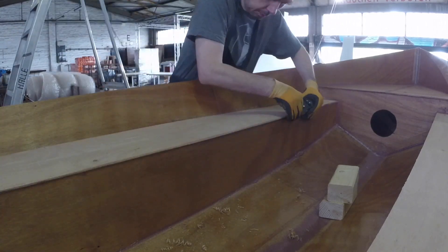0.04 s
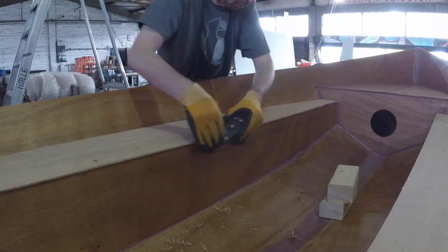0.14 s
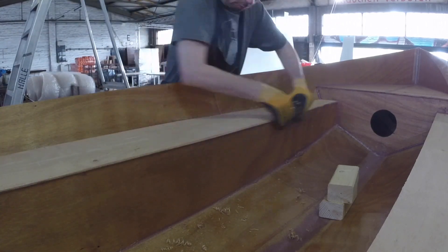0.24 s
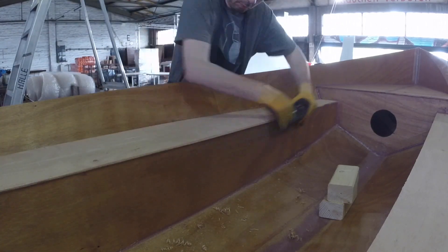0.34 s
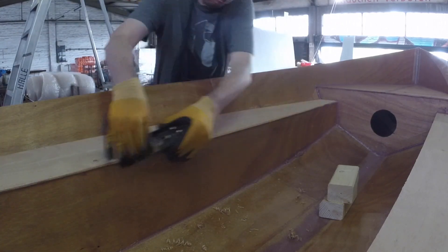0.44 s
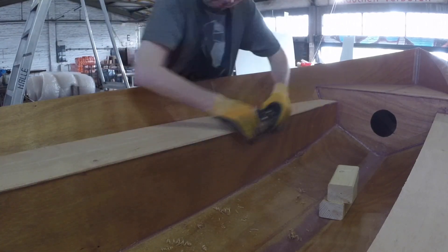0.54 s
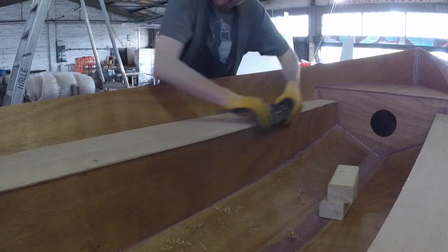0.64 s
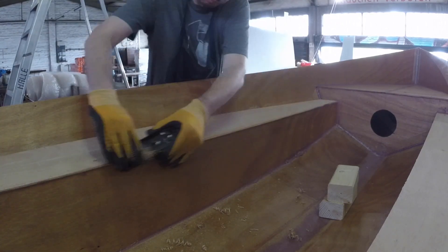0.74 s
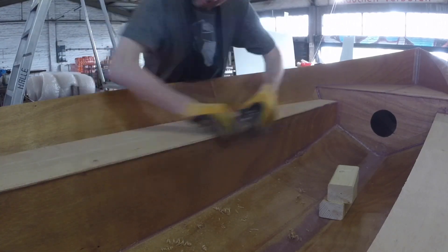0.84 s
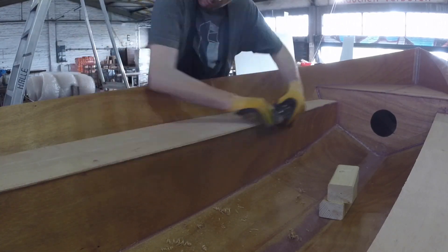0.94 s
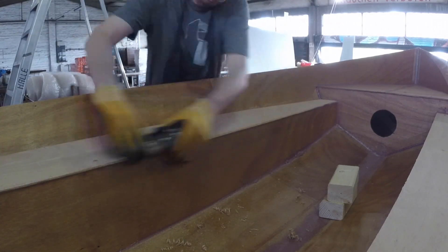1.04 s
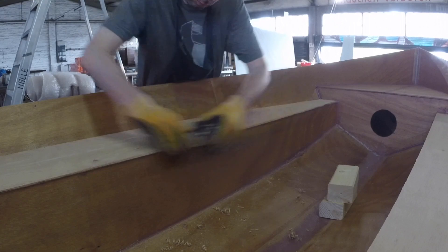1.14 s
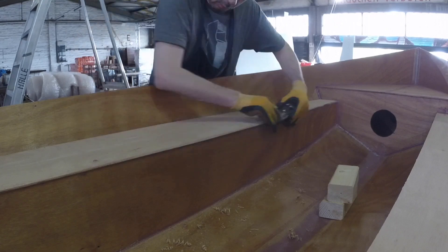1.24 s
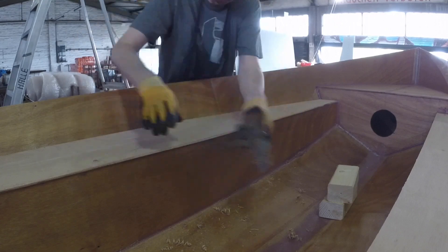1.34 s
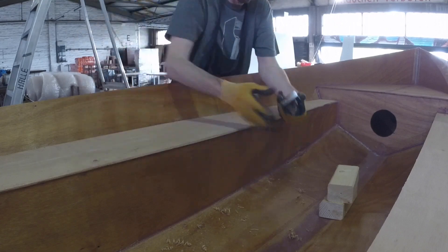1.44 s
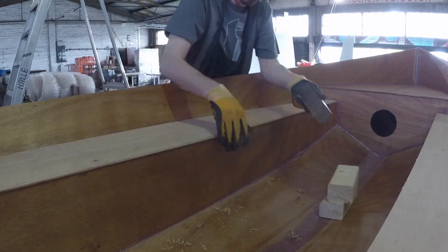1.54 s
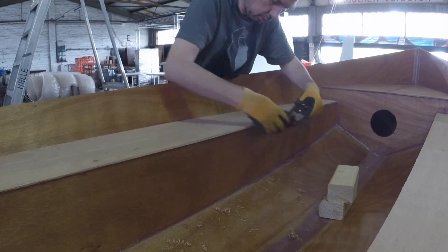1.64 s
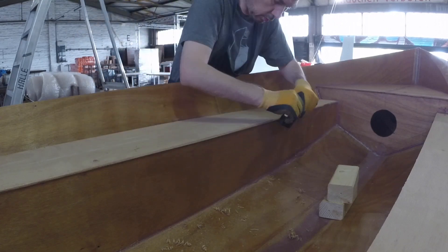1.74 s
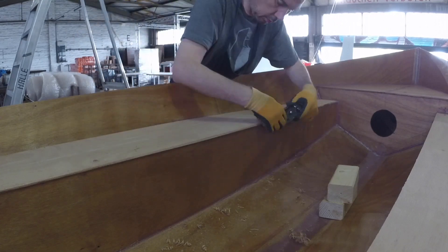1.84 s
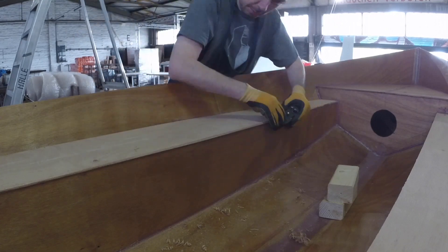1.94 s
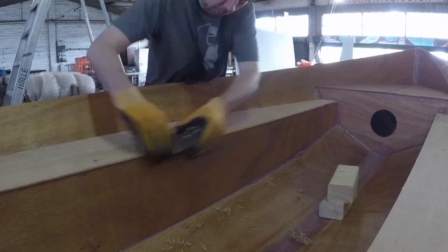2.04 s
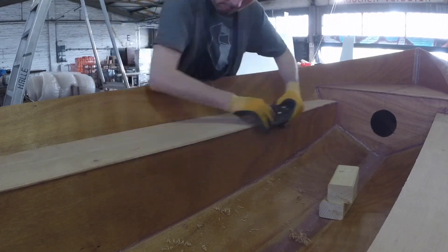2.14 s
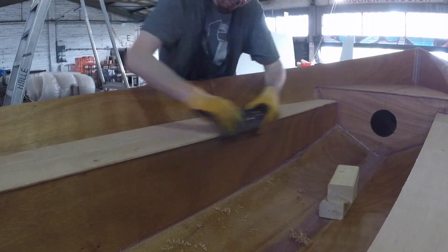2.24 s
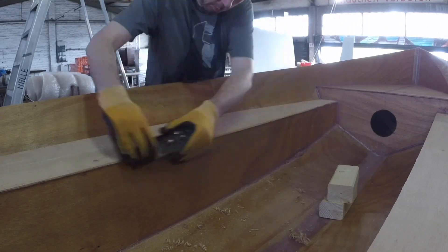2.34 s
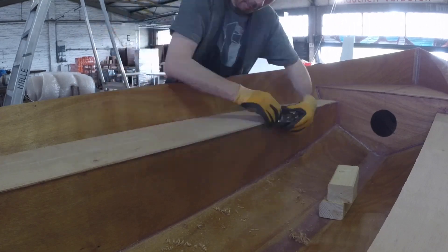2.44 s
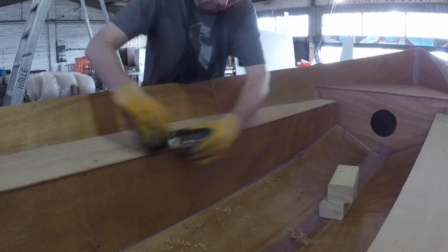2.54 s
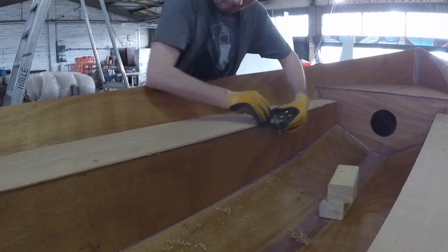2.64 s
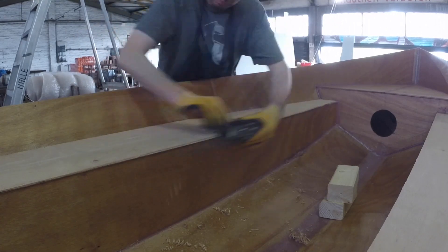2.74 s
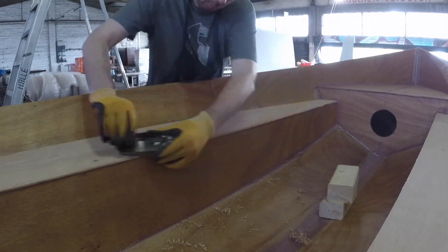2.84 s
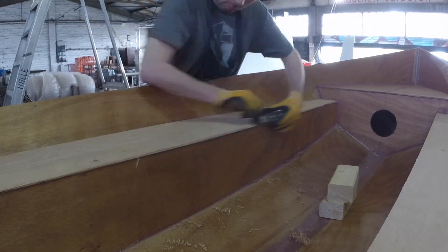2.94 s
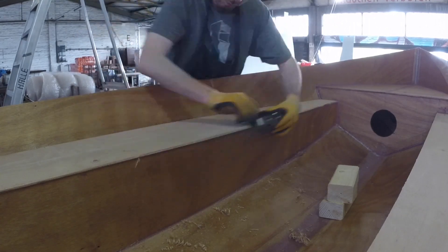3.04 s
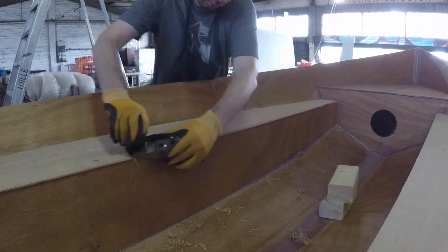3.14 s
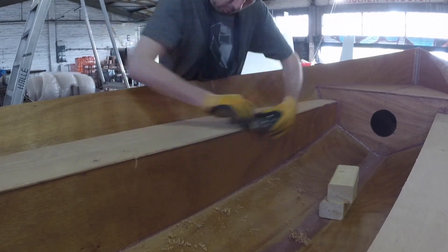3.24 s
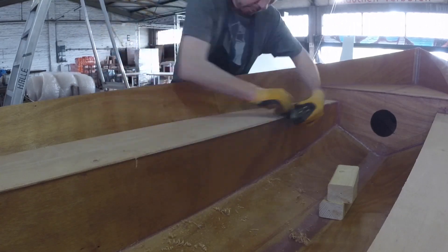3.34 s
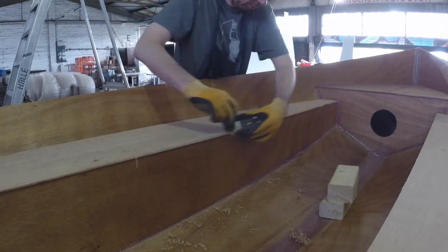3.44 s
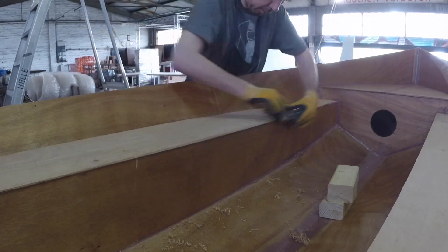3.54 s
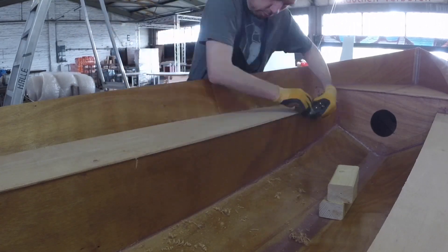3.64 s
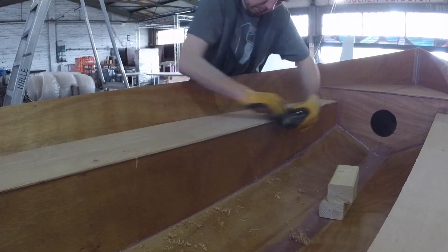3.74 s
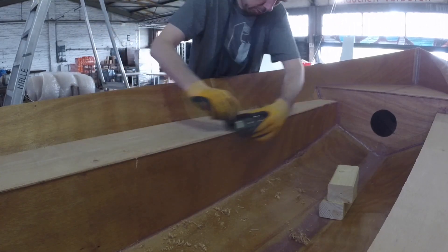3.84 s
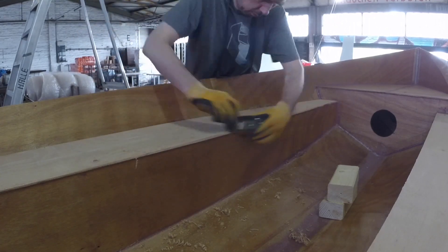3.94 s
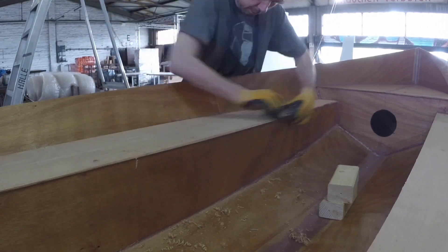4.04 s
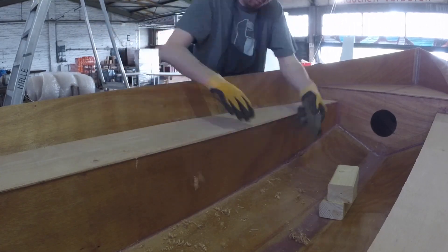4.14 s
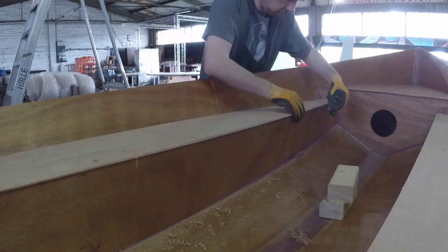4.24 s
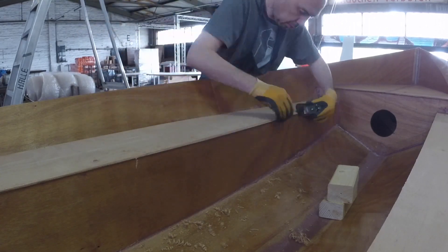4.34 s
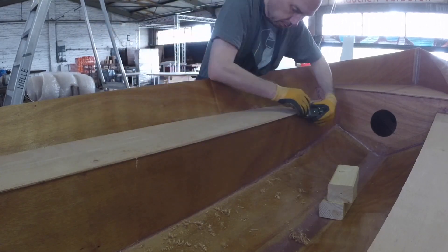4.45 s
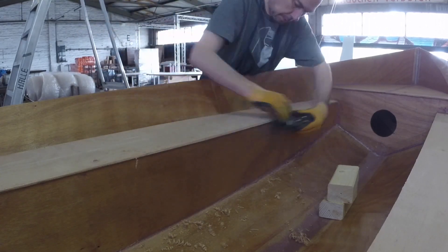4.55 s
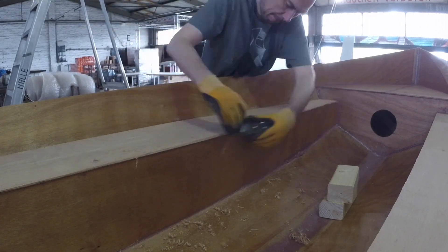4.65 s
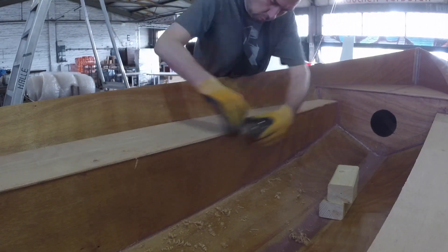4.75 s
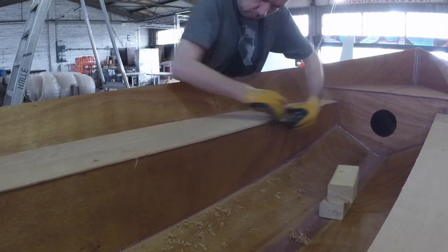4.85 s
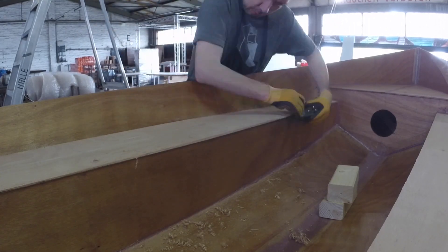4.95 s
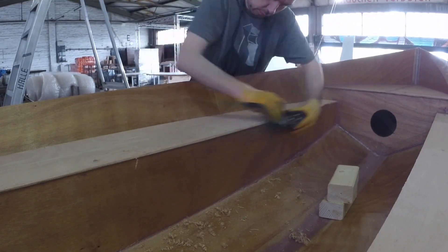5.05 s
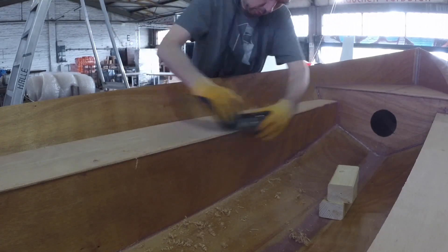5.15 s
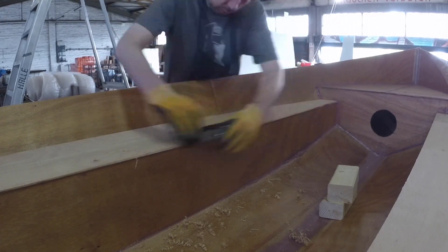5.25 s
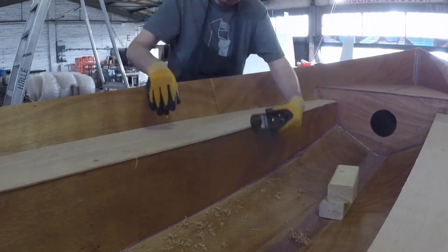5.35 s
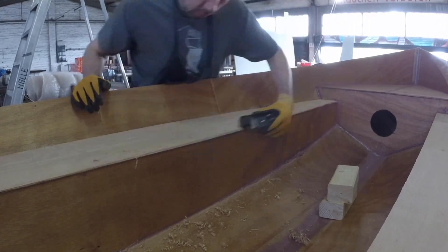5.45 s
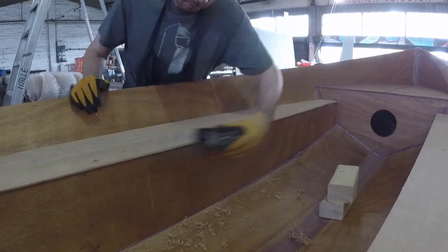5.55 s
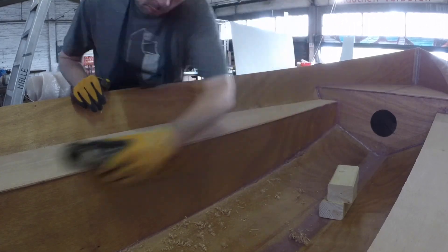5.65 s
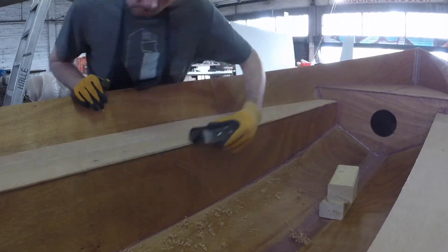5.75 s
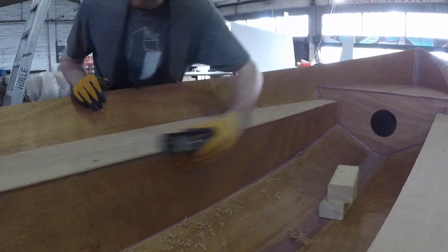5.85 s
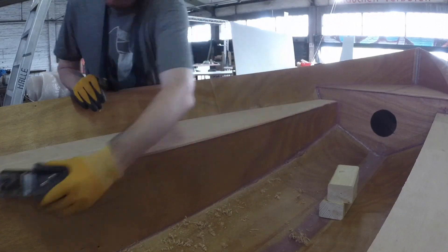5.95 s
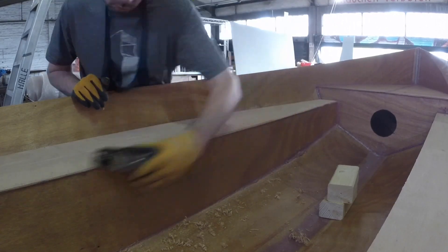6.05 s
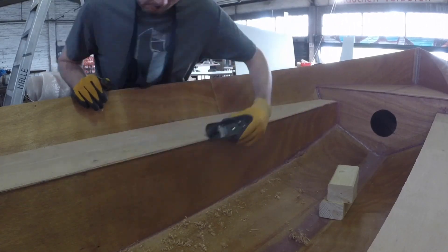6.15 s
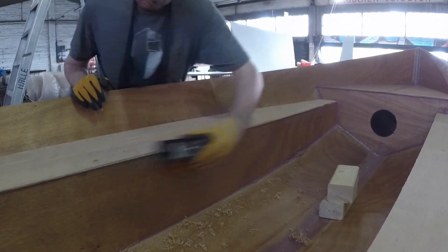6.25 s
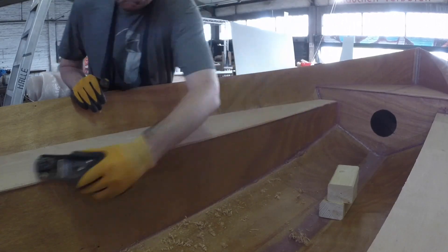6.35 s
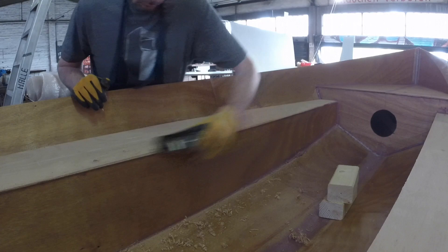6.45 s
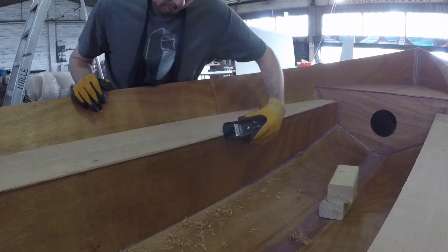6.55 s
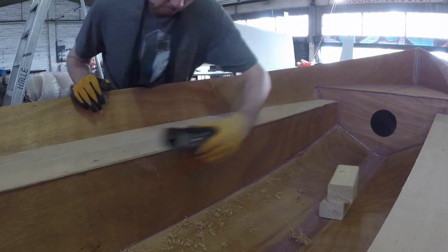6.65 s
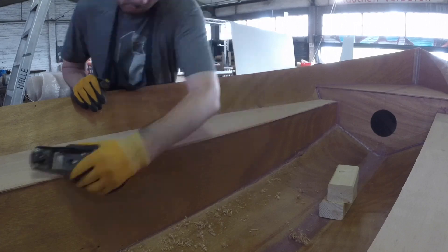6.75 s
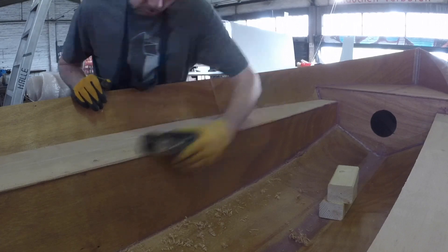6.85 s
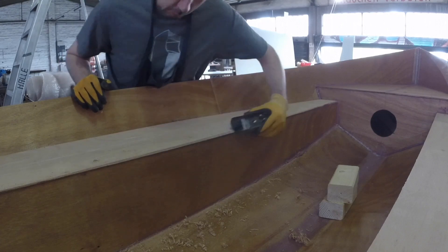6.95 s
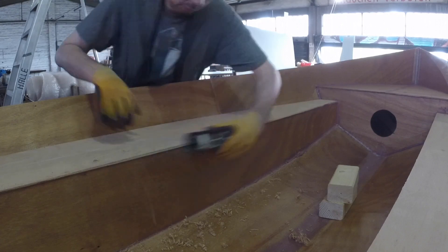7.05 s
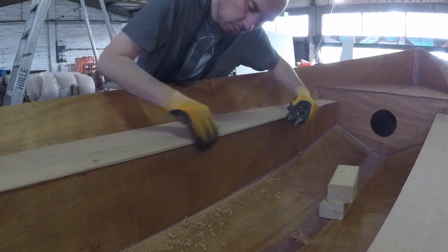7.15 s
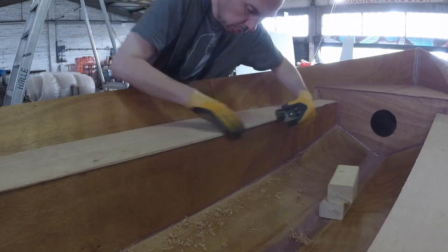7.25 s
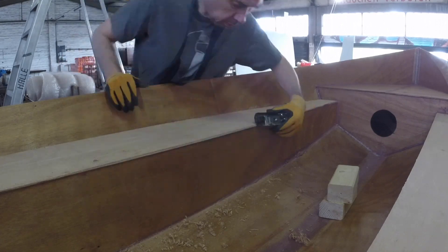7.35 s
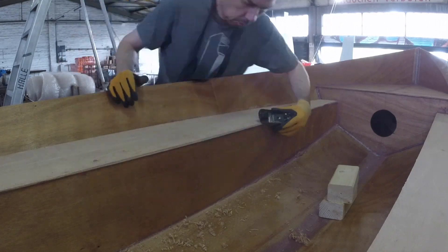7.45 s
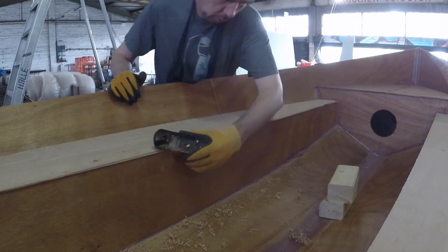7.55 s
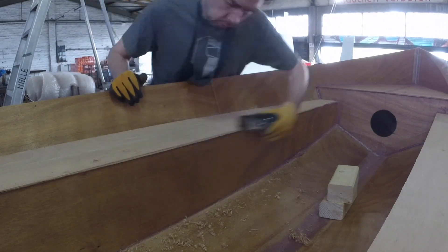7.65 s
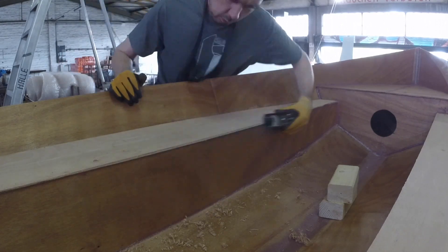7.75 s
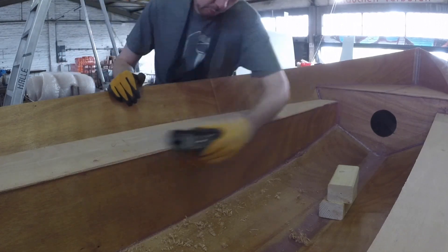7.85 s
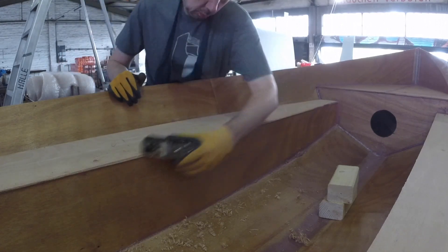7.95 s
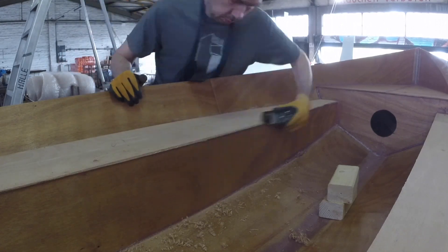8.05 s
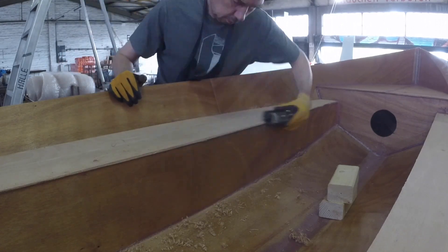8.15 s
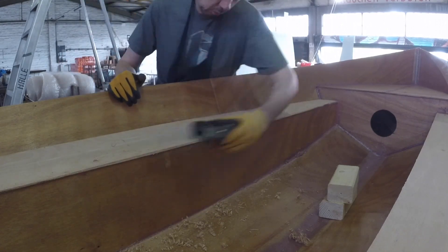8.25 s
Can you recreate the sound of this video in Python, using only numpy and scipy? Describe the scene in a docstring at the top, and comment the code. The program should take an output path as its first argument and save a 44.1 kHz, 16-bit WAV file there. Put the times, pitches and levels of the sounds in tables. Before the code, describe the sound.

A small hand plane scrapes along a wooden edge in short rasping strokes, with hollow plywood drumming, knocks and brief squeaks between small pauses.

```python
"""Workshop, inside a plywood boat hull: a small hand plane is pushed along a wooden edge.
The sole rubs and drums the hull: random slips through broad spectra and decaying panel modes.
The iron bites in short runs, each let go abruptly: stick-slip fractures give hiss, rasp and fizz.
Knocks rattle and boom on decaying sines, friction squeaks, ticks and taps are filtered impulses,
a glove brushes the wood, and faint coloured noise fills the shop."""
import sys
import numpy as np
from scipy import signal
from scipy.fft import rfft, irfft, next_fast_len
from scipy.io import wavfile
from scipy.ndimage import uniform_filter1d, map_coordinates

SR = 44100
rng = np.random.default_rng(int(sys.argv[2]) if len(sys.argv) > 2 else 0)


def to_wav(s):
    """Save 16-bit WAV."""
    ch = np.atleast_2d(s).T  # columns
    pcm = np.round(np.clip(ch, -1, 1) * 32767)  # PCM
    wavfile.write(sys.argv[1], SR, pcm.astype(np.int16))


N = 365588

# fibres tearing at the edge; also the glove's hiss: f/Hz, gain/dB
TEAR_SPECTRUM = [(760, -22), (1300, -8), (1490, -5.5), (2220, -1), (2550, -2.5), (3090, -3.5),
                 (3500, -10.5), (4460, -4.5), (4980, -11), (5780, -9.5), (7860, -23), (8500, -39),
                 (11000, -67), (18700, -120)]
# sole rubbing; also the glove's thrum: f/Hz, gain/dB
RUB_SPECTRUM = [(210, -27.5), (350, -3), (464, -2), (710, -0.5), (1070, -16.5), (1210, -19.5),
                (1420, -26.5), (2920, -27), (3640, -35), (4200, -31), (5840, -38), (8520, -51.5),
                (15000, -69)]
# dry tick; also the crackle under the sole: f/Hz, gain/dB
TICK_SPECTRUM = [(100, -6), (900, 12), (2000, 8.5), (6000, -1.5), (15000, -9)]
# narrow resonances of hull, plank and plane: f/Hz, width/Hz, lift/dB
RESONANCES = [(199.5, 47, 4.5), (285.5, 27, 4), (813, 9.6, 6), (1178, 23, 6), (1708, 20, 5), (1897, 81, 3),
              (2190, 18, 8.5), (2860, 23, 4), (3090, 35, 6), (3907, 41, 5), (5580, 170, 3), (10350, 290, 4)]


def amp(db):
    """Decibels to gain."""
    return 10 ** (np.asarray(db) / 20)


def unit(x):
    """Scale to rms 1."""
    return x / np.sqrt(np.mean(x ** 2) + 1e-20)


def along(points, hz):
    """Interpolate (f/Hz, value) points on a log frequency axis."""
    f, value = np.transpose(points)
    return np.interp(np.log(hz + 1), np.log(f + 1), value)


def wobble(rate_hz):
    """Smooth random curve of rms 1, rate_hz knots a second."""
    knots = rng.standard_normal(int(N * rate_hz / SR) + 4)
    return unit(map_coordinates(knots, [np.arange(N) * rate_hz / SR]))


def coloured(x, spectrum, resonances=()):
    """Causal minimum-phase filter: a broad spectrum plus narrow resonances."""
    m = 2 * next_fast_len(N // 2 + SR // 4)
    hz = np.fft.rfftfreq(m, 1 / SR)
    db = along(spectrum, hz)
    for f, width, lift_db in resonances:
        db = db + lift_db / (1 + (2 * (hz - f) / width) ** 2)
    # folding the cepstrum onto positive time makes the phase minimal
    cepstrum = irfft(np.log(amp(db) + 1e-6), m)
    cepstrum[1:m // 2] *= 2
    cepstrum[m // 2 + 1:] = 0
    response = np.exp(rfft(cepstrum))
    return irfft(rfft(x, m) * response, m)[:N]


def fractures(rate_hz, spread_db):
    """Tiny slips and breaks: impulses of random moment, sign and size."""
    happens = rng.random(N) < rate_hz / SR
    sign = rng.choice([-1, 1], N)
    size = amp(spread_db * np.clip(rng.standard_normal(N), -2, 2))
    return happens * sign * size


def burst(t60_s, size=8192):
    """Exponentially dying puff of noise with energy 1."""
    puff = rng.standard_normal(size) * amp(-60 * np.arange(size) / SR / t60_s)
    return puff / np.linalg.norm(puff)


def panels(x, t60_s, ring_db, travel_hz=9, count=6):
    """Direct sound plus dense plywood modes, whose mix changes as the plane travels."""
    mix = np.array([wobble(travel_hz) for _ in range(count)])
    mix /= np.linalg.norm(mix, axis=0)
    ringing = sum(share * signal.oaconvolve(x, burst(t60_s))[:N] for share in mix)
    return x + amp(ring_db) * ringing


def even(x, window_s):
    """A firm push steadies the power of a scrape: short-time rms drawn towards 1."""
    window = max(64, int(window_s * SR))
    power = np.abs(uniform_filter1d(unit(x) ** 2, window))
    return x / np.sqrt(power + 0.011) / np.std(x)


def shifting(x, depth_db, size=(7, 12)):
    """Changing colour: patches of random gain, size in bands of 86 Hz by steps of 6 ms."""
    z = signal.stft(x, nperseg=512)[2]
    patches = uniform_filter1d(rng.standard_normal(z.shape), size[0], axis=0)
    patches = uniform_filter1d(patches, size[1], axis=1)
    y = signal.istft(z * amp(depth_db * unit(patches)), nperseg=512)[1]
    return unit(y[:N])


def push(start, end, swell_db, arch_db, attack_s, t60_s):
    """Gain of one contact: attack, an arched hold that swells or fades, release."""
    gain = np.zeros(N)
    span = np.arange(max(0, int(start * SR)), min(N, int((end + t60_s) * SR)))
    t = span / SR
    from_middle = np.clip((t - start) / (end - start), 0, 1) - .5
    hold_db = swell_db * from_middle - arch_db * (2 * from_middle) ** 2
    release_db = -60 * np.maximum(t - end, 0) / t60_s
    gain[span] = np.clip((t - start) / attack_s, 0, 1) * amp(hold_db + release_db)
    return gain


def shop(level_db=-60.5):
    """Faint noise of the workshop, drifting a little in colour."""
    # room noise: f/Hz, gain/dB
    spectrum = [(13, -28), (22, -14), (43, 1), (64, -1.5), (204, -10), (335, -15), (667, -19), (1130, -21),
                (1220, -23.5), (2950, -30.5), (4580, -33), (14500, -49.5), (15800, -56)]
    noise = coloured(rng.standard_normal(N), spectrum)
    return amp(level_db) * shifting(noise, depth_db=1.4, size=(5, 20))


def pressure(attack_s=0.017, t60_s=0.068, arch_db=2.5):
    """Gains of drumming and rubbing: one push a slide, plus surges as the plane bears down."""
    # the sole slides on the wood: start/s, end/s, drumming/dB, rubbing/dB, swell start to end/dB
    slides = [(0.01, 0.157, -56, -59, -12), (0.164, 1.387, -49.5, -37.5, -6), (1.897, 2.075, -48, -57.5, 7),
              (2.076, 2.575, -49.5, -37, -9), (2.617, 3.186, -40.5, -38.5, -1.5),
              (3.211, 4.139, -45, -38.5, -0.5), (4.29, 4.636, -58, -53.5, 24),
              (4.59, 5.36, -46, -38.5, 0.5), (5.52, 6.392, -47, -39, -4), (6.433, 6.904, -48, -39, 0),
              (6.894, 7.194, -43, -41.5, 2.5), (7.366, 7.478, -46.5, -52.5, -10),
              (7.483, 7.601, -46.5, -49.5, 13), (7.62, 8.296, -44, -39.5, 2)]
    # the plane bears down: t/s, half width to 1/e gain/s, drumming/dB, rubbing/dB
    surges = [(0.218, 0.033, -41, -51), (0.384, 0.0077, -42, -31), (0.72, 0.087, -59, -38.5),
              (0.802, 0.035, -48, -33), (0.941, 0.02, -40, -31), (1.05, 0.017, -45, -31.5),
              (1.214, 0.065, -33.5, -33), (1.347, 0.037, -39, -42), (2.303, 0.0089, -52, -30),
              (2.361, 0.074, -40, -33.5), (2.504, 0.06, -36, -34), (2.99, 0.045, -37, -45),
              (3.17, 0.03, -38, -39.5), (3.574, 0.035, -34, -34.5), (3.68, 0.03, -44, -34.5),
              (3.878, 0.038, -39, -46), (4.66, 0.066, -37, -35.5), (5.061, 0.025, -37.5, -32),
              (5.167, 0.072, -43.5, -30.5), (5.295, 0.039, -35, -52), (5.358, 0.013, -32.5, -38.5),
              (5.928, 0.069, -42, -34), (6.179, 0.18, -40.5, -37.5), (6.56, 0.15, -41.5, -40),
              (6.791, 0.043, -39, -33), (7.646, 0.016, -52, -27.5), (7.702, 0.036, -39, -37.5),
              (8.235, 0.057, -35.5, -37)]
    t = np.arange(N) / SR
    power = np.zeros((2, N))
    for start, end, *levels_db, swell_db in slides:
        weight = push(start, end, swell_db, arch_db, attack_s, t60_s)
        power += np.outer(amp(levels_db) ** 2, weight ** 2)
    for s, half_width, *levels_db in surges:
        near = np.abs(t - s) < np.pi * half_width
        bump = np.exp(-2 * ((t[near] - s) / half_width) ** 2)
        power[:, near] += np.outer(amp(levels_db) ** 2, bump)
    return np.sqrt(power)


def sole(drum_db=2.0, rub_db=-1.5, drag_db=-14, crackle_db=-6, fibre_db=-29):
    """Sole catching on rough wood: coarse slips shake the hull, fine ones rub, fibres crackle."""
    # hull drumming: f/Hz, gain/dB
    hull_spectrum = [(18, -43), (30, -11.5), (80, -11), (129, -1), (162, -4), (192, -5.5), (225, -8),
                     (280, 0), (313, -4), (351, -2.5), (388, -12.5), (450, -3.5), (580, -41), (990, -120)]
    # loose fibres: f/Hz, gain/dB
    fibre_spectrum = [(900, -4), (3500, 3), (14000, -17.5)]
    drum, rub = pressure()
    rub = np.hypot(amp(rub_db) * rub, amp(drag_db) * drum)  # even a light drag rubs a little

    coarse = panels(fractures(rate_hz=700, spread_db=3.0), t60_s=0.096, ring_db=0.5)
    shaking = even(coloured(coarse, hull_spectrum, RESONANCES), window_s=0.099)
    crackle = coloured(fractures(rate_hz=17, spread_db=4.0), TICK_SPECTRUM)

    fine = panels(fractures(rate_hz=4500, spread_db=4.5), t60_s=0.11, ring_db=-5.0)
    friction = coloured(fine, RUB_SPECTRUM, RESONANCES)
    rubbing = even(shifting(friction, depth_db=2.5, size=(2, 8)), window_s=0.04)
    fibres = unit(coloured(fractures(rate_hz=320, spread_db=4.2), fibre_spectrum))

    drumming = drum * (amp(drum_db) * shaking + amp(crackle_db) * crackle)
    return drumming + rub * (rubbing + amp(fibre_db) * fibres)


def snaps(events, spectrum, level_db):
    """Single dry clicks: filtered impulses with no added resonances."""
    hits = np.zeros(N)
    s, db = np.transpose(events)
    hits[np.round(s * SR).astype(int)] = amp(db)
    return amp(level_db) * coloured(hits, spectrum)


def taps():
    """Short dead taps: impulses through a dull spectrum."""
    # t/s, relative level/dB
    events = [(0.067, -19), (7.213, -24.5)]
    # f/Hz, gain/dB
    spectrum = [(60, -12), (350, 2.5), (600, -12), (1200, -23), (5000, -47)]
    return snaps(events, spectrum, level_db=27.0)


def ticks():
    """Sharp dry ticks: impulses through a bright spectrum."""
    # t/s, relative level/dB
    events = [(0.0705, -41.5), (0.1697, -43), (0.531, -49), (0.6372, -28.5), (0.795, -47), (0.9382, -39),
              (1.0938, -34), (1.251, -44), (1.397, -46), (2.3114, -39), (2.469, -30.5), (2.782, -36.5),
              (2.927, -35.5), (2.975, -35.5), (3.085, -44), (3.229, -44), (3.5293, -34), (3.541, -37),
              (3.698, -42), (3.951, -46), (4.7566, -46), (5.0583, -41), (5.214, -43), (5.2255, -42),
              (5.5163, -37), (6.1422, -30), (6.6008, -34), (7.214, -38.5), (7.36, -44.5), (7.5158, -47),
              (7.662, -43), (7.8194, -33.5), (8.277, -39)]
    return snaps(events, TICK_SPECTRUM, level_db=11.5)


def cut_depth(attack_even_s=0.013, attack_doubles_db=5, longest_attack=0.22, arch_db=3, t60_s=0.014):
    """Gains of hiss, rasp, fizz: hard starts catch at once, swelling bites ease in, all let go abruptly."""
    # the iron bites: start/s, end/s, swell start to end/dB, tearing hiss/dB, plank rasp/dB, shaving fizz/dB
    bites = [(0.128, 0.156, 0, -76, -52.5, -95), (0.169, 0.336, -4, -52, -38.5, -71),
             (0.318, 0.468, -18, -51.5, -37.5, -69), (0.479, 0.537, -14, -48, -30.5, -63.5),
             (0.578, 0.666, -1.5, -47.5, -32, -69), (0.692, 0.809, 6.5, -48, -37, -65),
             (0.886, 0.953, 4, -51, -37.5, -65.5), (0.977, 1.093, 5, -47, -37, -67),
             (1.126, 1.349, -1, -46, -34, -65.5), (1.378, 1.397, -1, -57, -40, -79.0),
             (1.427, 1.445, 7, -57.5, -42, -78), (2.02, 2.17, 17.5, -53.5, -38, -74),
             (2.165, 2.278, 3, -54.5, -37, -74), (2.26, 2.332, 0.5, -47, -34, -64),
             (2.348, 2.469, 11, -46.5, -32, -63), (2.615, 2.634, -10, -54.5, -41, -76),
             (2.696, 2.77, 3.5, -48, -34, -71), (2.766, 2.926, 1, -51.5, -37, -70),
             (2.956, 3.04, -4.5, -56, -39.5, -78), (3.218, 3.296, -4, -57, -46, -75),
             (3.312, 3.394, 11.5, -51.5, -38.5, -73), (3.406, 3.593, 4.5, -51, -35.5, -70),
             (3.582, 3.698, 19.5, -53, -39, -72), (3.725, 3.841, 5.5, -41, -31.5, -61.5),
             (3.834, 3.947, 2, -44.5, -32.5, -66.5), (3.998, 4.094, -13.5, -46, -34.5, -65),
             (4.124, 4.155, 11, -53.5, -42.5, -72.5), (4.177, 4.193, -4, -67, -49, -90),
             (4.614, 4.758, 22.5, -50, -35.5, -69), (4.802, 4.915, -1, -44.5, -32, -63),
             (4.913, 5.023, -6, -44, -35, -60), (5.063, 5.217, 21, -76, -41, -89),
             (5.217, 5.375, -7.5, -49.5, -40.5, -71), (5.401, 5.42, 5, -65, -45, -78),
             (5.513, 5.638, -6, -46.5, -35, -62), (5.666, 5.78, -3, -44, -33, -58.5),
             (5.829, 5.975, -17.5, -45, -33, -62.5), (5.974, 6.057, -14, -48.5, -40.5, -63.5),
             (6.08, 6.138, 4, -59, -55, -74), (6.163, 6.287, 3, -51, -42.5, -69),
             (6.308, 6.338, 10, -51.5, -42.5, -64), (6.427, 6.607, 1, -46, -36.5, -64.5),
             (6.625, 6.746, 9.5, -44, -34, -57.5), (6.765, 6.859, 7, -48.5, -36.5, -64.5),
             (6.9, 7.043, -14, -45.5, -37, -59), (7.04, 7.13, -10.5, -46.5, -34, -62),
             (7.113, 7.204, 9, -49.5, -43, -64.5), (7.558, 7.685, 10, -51.5, -37.5, -70),
             (7.688, 7.819, 12, -44.5, -34.5, -59.5), (7.854, 7.969, 2.5, -41, -32, -57),
             (7.975, 8.073, 0, -42.5, -32.5, -61), (8.118, 8.284, -9, -44, -34.5, -60.5)]
    # power with which hiss, rasp, fizz follow the depth of the cut
    follow = np.array([1, 0.91, 1.1])[:, None]
    power = np.zeros((3, N))
    for start, end, swell_db, *levels_db in bites:
        attack_s = attack_even_s * 2 ** (swell_db / attack_doubles_db)
        attack_s = min(attack_s, longest_attack * (end - start))  # capped as a share of the bite
        depth = push(start, end, swell_db, arch_db, attack_s, t60_s)
        cutting = depth > 0
        gains = amp(levels_db)[:, None] * depth[cutting] ** follow
        power[:, cutting] += gains ** 2
    return np.sqrt(power)


def chatter(slip_hz=150, uneven=0.6, depth_db=9):
    """Uneven stick-slip of the iron: gain jumps at each slip and sags until the next."""
    slips = np.cumsum(slip_hz * np.exp(uneven * wobble(120))) / SR
    return unit(amp(-depth_db * (slips % 1)))


def iron(splinter_db=-7.5, grain_db=0.7, catch_db=0.87):
    """Slips break fibres: edge hiss and splinters, shaving fizz, plank rasp, all following the grain."""
    # shaving fizz: f/Hz, gain/dB
    fizz_spectrum = [(4000, -19), (6500, -2.5), (7600, 9.5), (8600, 1.5), (10200, 4), (11000, 1),
                     (12300, -7), (13600, -2), (15000, -8), (15800, -20)]
    # plank rasp: f/Hz, gain/dB
    rasp_spectrum = [(190, -26), (330, -4), (397, -12), (468, -6.5), (544, 1), (595, -1.5), (786, 1.5),
                     (963, -8), (1100, -7), (1140, -16.5), (1190, -5), (1290, -18.5), (1500, -28),
                     (1950, -31), (3300, -120)]
    hiss, rasp, fizz = cut_depth()
    slips = chatter()

    breaks = slips * fractures(rate_hz=6500, spread_db=1.0)
    tearing = unit(panels(breaks, t60_s=0.072, ring_db=-1.5))
    splinters = unit(fractures(rate_hz=220, spread_db=5.0))
    edge = coloured(tearing + amp(splinter_db) * splinters, TEAR_SPECTRUM, RESONANCES)
    edge = shifting(edge, depth_db=1.0)

    shaving = coloured(fractures(rate_hz=8000, spread_db=5.5), fizz_spectrum, RESONANCES)
    shaving = shifting(shaving, depth_db=3.0)

    coarse = panels(slips * fractures(rate_hz=1600, spread_db=1), t60_s=0.054, ring_db=0.0)
    rasping = even(coloured(coarse, rasp_spectrum, RESONANCES), window_s=0.026)

    grain = amp(grain_db * wobble(80) + catch_db * wobble(25))  # fine grain and coarser hard spots
    return grain * (hiss * edge + fizz * shaving + rasp * rasping)


def squeaks(waver_hz=20, rough_db=1.6, arch_db=4, attack_s=0.0047, t60_s=0.029):
    """Friction makes plane, plank or hull sing briefly: sines wavering in pitch and level."""
    # start/s, end/s, f/Hz, level/dB
    events = [(0.322, 0.444, 2175, -52.5), (0.778, 0.826, 522, -32.5), (0.779, 0.815, 1179, -38.5),
              (0.99, 1.07, 271.4, -35.5), (1.027, 1.086, 802, -34.5), (1.422, 1.443, 1172, -44),
              (2.071, 2.15, 740, -35), (2.175, 2.328, 773, -38.5), (2.928, 2.985, 508, -34.5),
              (3.57, 3.612, 813, -34), (3.637, 3.736, 295, -38.5), (3.76, 3.8, 1227, -39.5),
              (3.89, 3.948, 1194, -36.5), (4.679, 4.734, 1157, -41), (4.803, 4.887, 820, -33),
              (4.868, 4.91, 1190, -42), (5.056, 5.08, 1167, -39.5), (5.122, 5.21, 314, -34.5),
              (5.599, 5.629, 1174, -38.5), (5.684, 5.718, 1179, -40), (5.827, 5.862, 1172, -32.5),
              (5.835, 5.913, 278, -39), (5.945, 5.992, 785, -34), (6.038, 6.166, 290.4, -38),
              (6.645, 6.718, 1179, -36), (6.804, 6.85, 800, -38), (7.66, 7.704, 638, -33)]
    out = np.zeros(N)
    for start, end, hz, db in events:
        phase = 2 * np.pi * np.cumsum(hz + waver_hz * wobble(250)) / SR
        tone = unit(np.sin(phase) * amp(rough_db * wobble(120)))
        out += amp(db) * push(start, end, 0, arch_db, attack_s, t60_s) * tone
    return out


def knocks(level_db=-4, shake_db=3):
    """Plane bumps the plank: a brief rattle, and the panel below booms at a pitch set by the spot."""
    # t/s, relative rattle level/dB, boom level/dB, boom f/Hz, boom rise/s
    bumps = [(0.583, -22, -30, 135, 0.0022), (1.136, -14.5, -25, 288, 0.0047),
             (1.188, -24, -12.5, 190, 0.013), (1.906, -37, -41, 144, 0.0024),
             (2.469, -12.5, -24, 127, 0.00044), (2.651, -39, -32, 115, 0.0034),
             (2.714, -28, -26, 194, 0.004), (2.925, -36, -28, 129, 0.0036),
             (2.972, -24, -18.5, 289, 0.0086), (3.075, -17, -38, 278, 0.002), (3.156, -24, -27, 140, 0.003),
             (3.547, -18, -23, 284, 0.006), (4.604, -22, -24, 192, 0.0088),
             (4.612, -11.5, -15.5, 337, 0.012), (4.646, -11.5, -24, 246, 0.0045),
             (5.046, -18.5, -41, 280, 0.0033), (5.766, -14.5, -28, 140, 0.0015),
             (6.505, -37, -26, 150, 0.004), (6.607, -30, -25, 155, 0.0036),
             (7.36, -21.5, -33.5, 245, 0.0017), (7.397, -30, -32.5, 124, 0.0018),
             (7.512, -41, -40, 186, 0.003), (8.149, -23, -27, 188, 0.003)]
    # multiple of the boom pitch, level/dB, t60/s
    boom_modes = [(1, 1.5, 0.099), (2.09, -13, 0.04)]
    # rattle: f/Hz, gain/dB
    spectrum = [(40, -43), (130, -4.5), (300, 10), (480, -0.5), (700, 2), (1200, -20.5), (5000, -56)]
    blows, booms = np.zeros((2, N + SR))
    t = np.arange(SR // 3) / SR
    for s, db, boom_db, hz, rise_s in bumps:
        first = round(s * SR)
        blow = amp(shake_db) * burst(t60_s=0.055)
        blow[0] += 1
        blows[first:][:len(blow)] += amp(db) * blow / np.linalg.norm(blow)
        ring = sum(amp(mode_db - 60 * t / t60_s) * np.sin(2 * np.pi * k * hz * t)
                   for k, mode_db, t60_s in boom_modes)
        booms[first:][:len(t)] += amp(boom_db) * ring * (1 - np.exp(-t / rise_s))
    peak = np.abs(coloured(signal.unit_impulse(N), spectrum, RESONANCES)).max()
    rattle = coloured(blows[:N], spectrum, RESONANCES) / peak
    return amp(level_db) * rattle + booms[:N]


def glove(thrum_db=10, fade_s=0.011, uneven_db=2):
    """A glove brushes the wood: friction noise as a soft hiss and an uneven lower stir of the hull."""
    # start/s, end/s, hiss level/dB
    brushes = [(1.7, 1.766, -80), (4.157, 4.556, -78.5), (5.387, 5.47, -79), (7.21, 7.347, -71.5)]
    touch = sum(amp(db) * push(start, end, 0, 0, fade_s, fade_s) for start, end, db in brushes)
    friction = rng.standard_normal(N)
    hiss = unit(coloured(friction, TEAR_SPECTRUM))
    stir = amp(thrum_db + uneven_db * wobble(25)) * unit(coloured(friction, RUB_SPECTRUM))
    return touch * (hiss + stir)


def scene():
    """Sum of plane, hull, glove, taps and dry ticks over the noise of the shop, one channel."""
    small = taps() + ticks() + glove()
    return (shop() + sole() + iron() + squeaks() + knocks() + small)[None]


def record(dry, top_hz=15800):
    """Brick-wall low-pass: nothing above top_hz is kept."""
    m = next_fast_len(N + SR // 2)
    passed = np.fft.rfftfreq(m, 1 / SR) < top_hz
    return irfft(rfft(dry, m) * passed, m)[..., :N]


dry = scene()
out = record(dry)
to_wav(out)
```